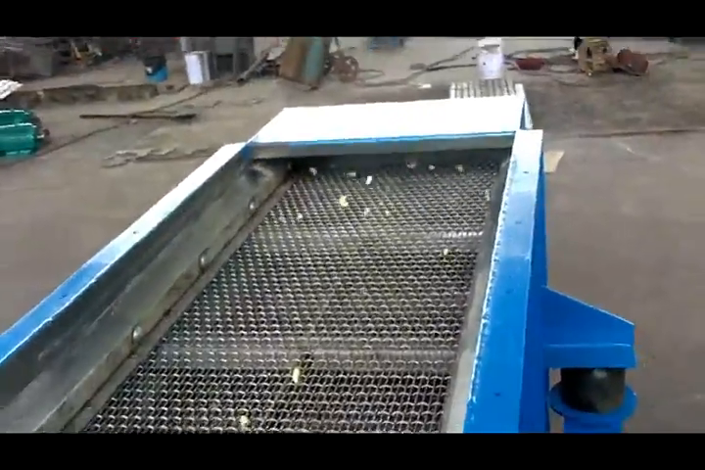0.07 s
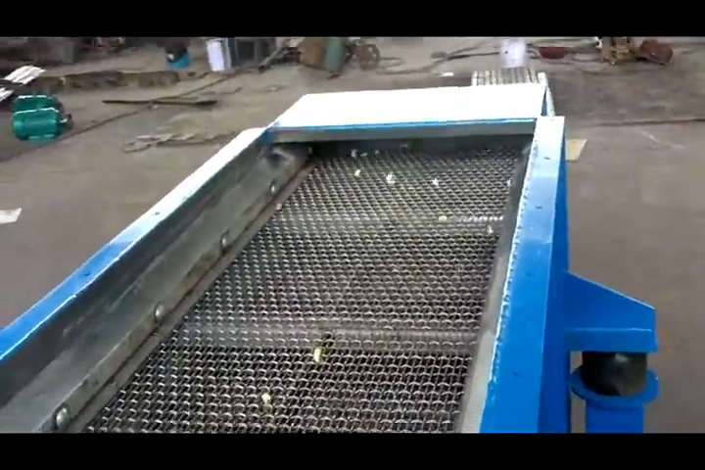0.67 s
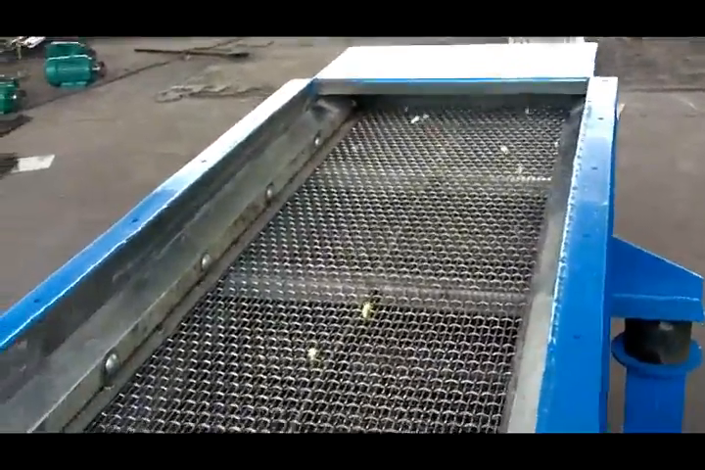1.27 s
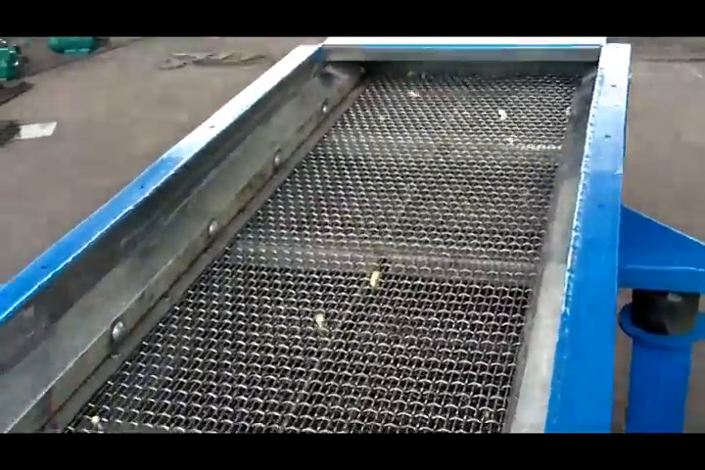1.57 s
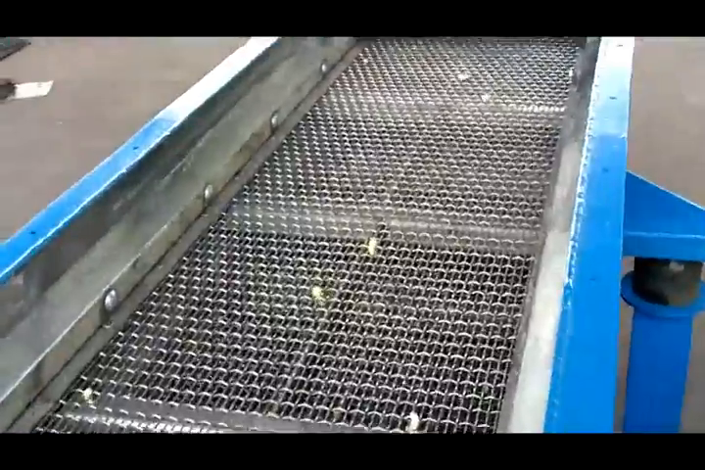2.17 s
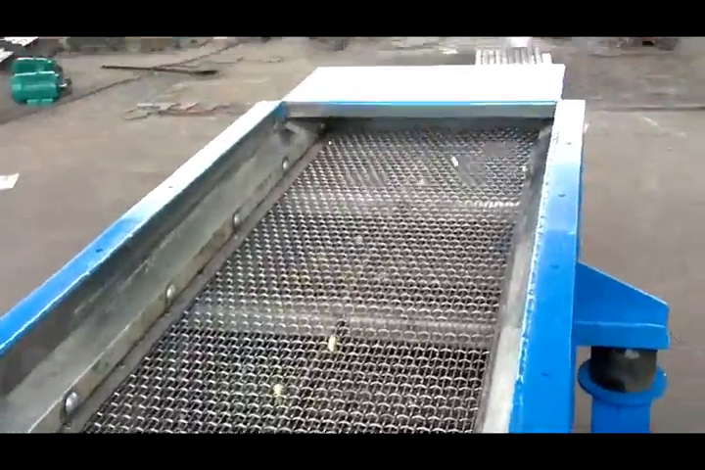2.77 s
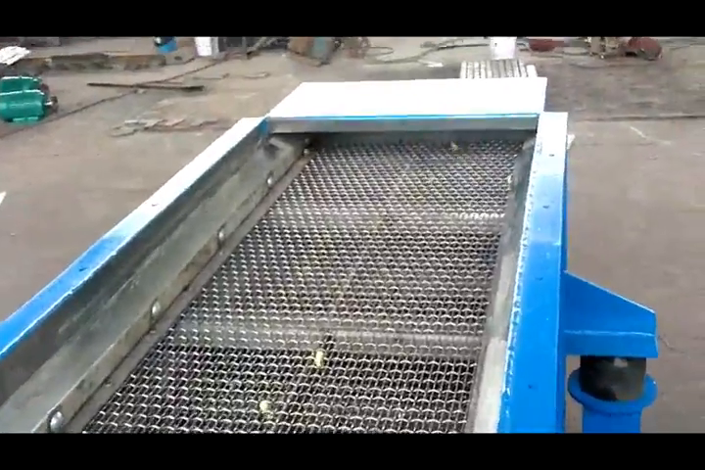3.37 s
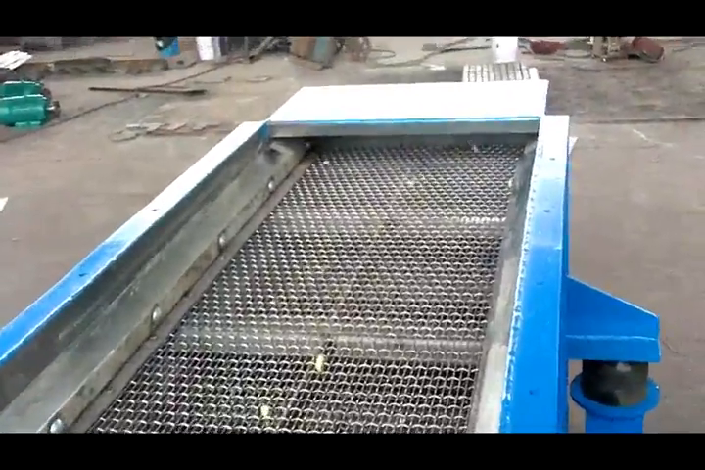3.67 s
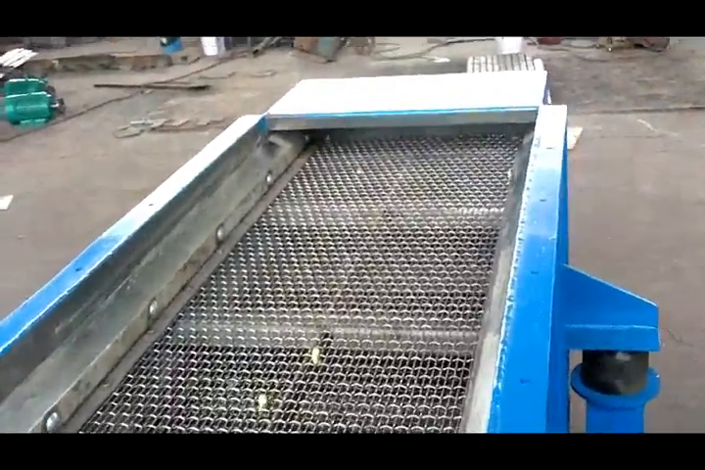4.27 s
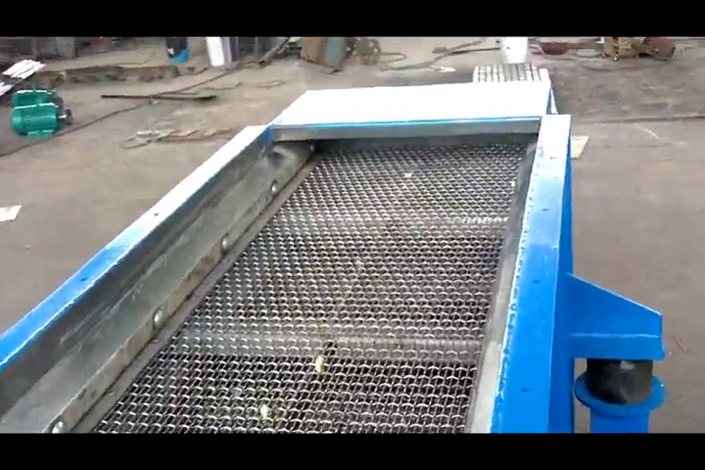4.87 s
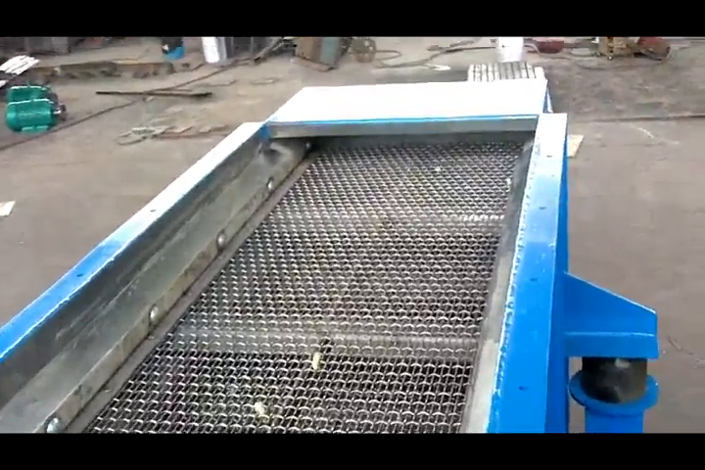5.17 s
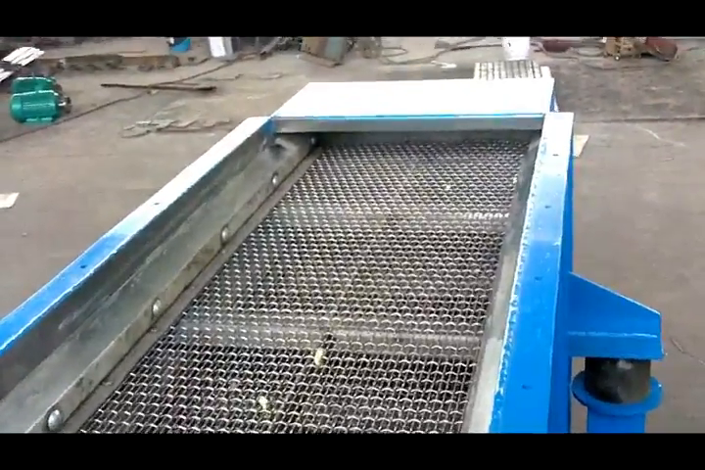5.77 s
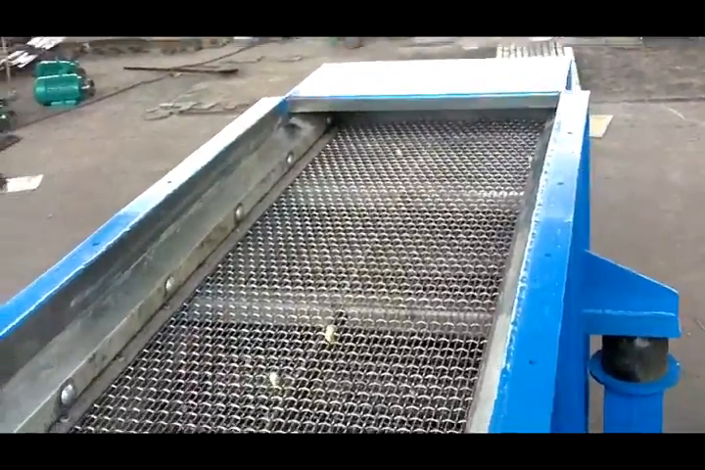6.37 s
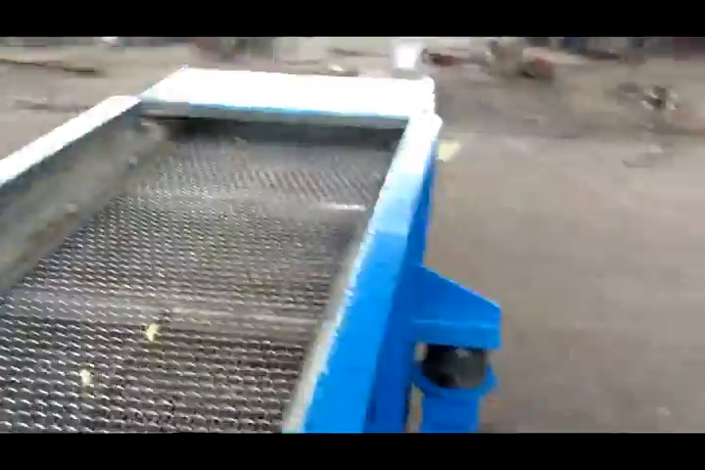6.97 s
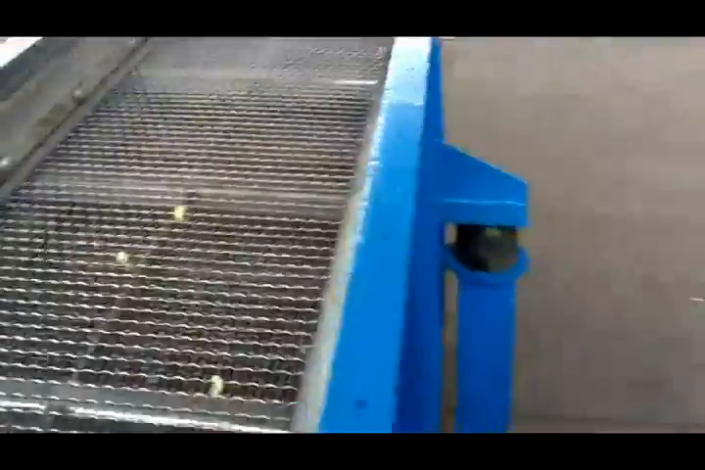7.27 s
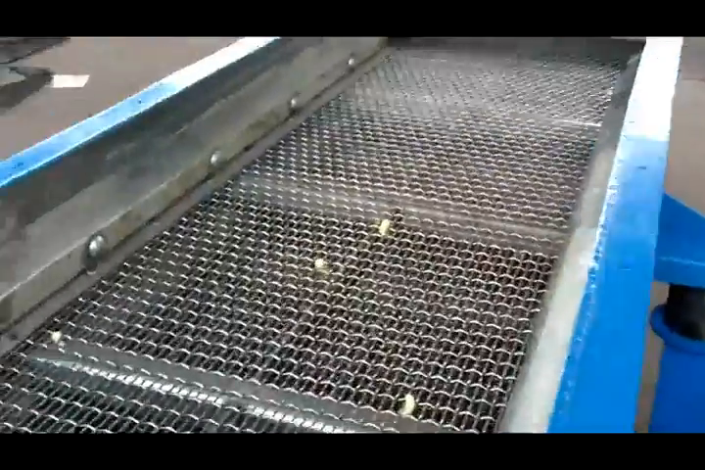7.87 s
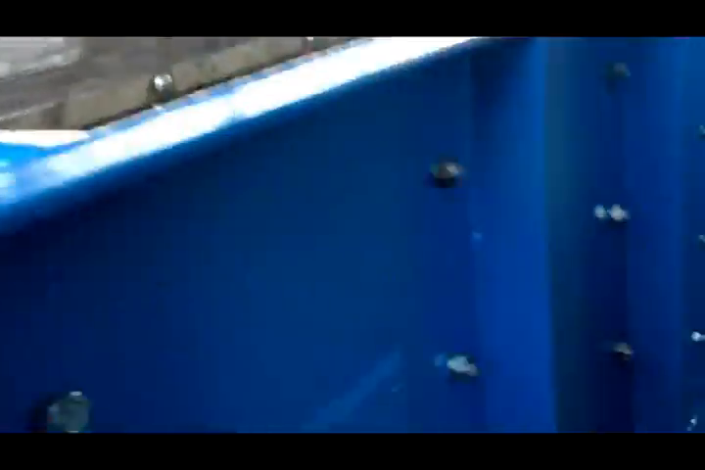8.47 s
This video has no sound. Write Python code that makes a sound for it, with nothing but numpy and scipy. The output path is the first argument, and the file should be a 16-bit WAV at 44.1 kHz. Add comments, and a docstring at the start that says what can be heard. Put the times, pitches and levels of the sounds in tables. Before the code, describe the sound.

Heard from just above its trough, a vibrating steel sieve hums, rumbles and rattles continuously, with a faint low workshop murmur behind it. Rapid metallic knocks blend into a hollow ringing clatter, topped by the fluttering hiss of wire mesh and a few small crumbs. An occasional dull thud breaks through, the clearest late on, then a hollow metal ring grows as the microphone moves nearer.

```python
"""A droning, rattling clatter under a pulsing hiss: a nearly empty vibrating screen, close up in a workshop.
Its eccentric weights turn about 1000 times a minute; each turn thumps the steel box as it lifts, knocks
it as it lands and rattles the deck against its clamps, while a low tone near 127 Hz drones in uneven
swells. The woven wire mesh and a few crumbs on it chatter as the hiss.
The microphone moves over the trough and leans in over its near wall at the end."""
import sys
import numpy as np
from scipy import signal
from scipy.fft import rfft, irfft, next_fast_len
from scipy.io import wavfile
from scipy.ndimage import uniform_filter1d

SR = 44100
rng = np.random.default_rng(int(sys.argv[2]) if len(sys.argv) > 2 else 0)


def transcribe(u):
    """Save the signal u as a 16-bit wav file named by the first command-line argument.

    u: samples, shape (n,) or (channels, n), limited to [-1, 1]; the rate is SR.
    q: integer samples, one column per channel.
    """
    v = np.clip(np.atleast_2d(u).T, -1, 1)
    q = np.round(v * 32767).astype(np.int16)
    wavfile.write(sys.argv[1], SR, q)


N = 374838

SHAFT_HZ = 16.599
HUM_BASE_HZ = SHAFT_HZ / 3
DRONE_MULTIPLE = 23   # of the hum's base
LANDING_TURN, LIFT_TURN = .67, .38   # shares of a turn
# the low drone's level, throbbing unevenly about three times a second: (time [s], level [dB])
DRONE_LEVEL = [(0.0, -40.5), (0.18, -21.5), (0.26, -41), (0.48, -24.5), (0.63, -29), (0.91, -27.5),
               (1.0, -24.5), (1.09, -35), (1.2, -23.5), (1.37, -30.5), (1.46, -21.5), (1.58, -38),
               (1.9, -23), (2.36, -32.5), (2.48, -27.5), (2.58, -33.5), (2.72, -21.5), (2.88, -35),
               (2.97, -22.5), (3.04, -36), (3.29, -29), (3.44, -33), (3.59, -22.0), (3.82, -28),
               (4.0, -17.5), (4.12, -26), (4.47, -29), (4.6, -22), (4.65, -17.5), (4.86, -25.5),
               (4.97, -18), (5.07, -23.5), (5.18, -20.5), (5.44, -24), (5.55, -28), (5.64, -17.5),
               (5.74, -24), (5.84, -17.5), (5.95, -29), (6.11, -18.5), (6.24, -28), (6.41, -21.5),
               (6.75, -23), (6.83, -19.5), (6.94, -40), (7.04, -23.5), (7.23, -27), (7.4, -20.5),
               (7.66, -23.5), (7.85, -28.5), (7.95, -22), (8.02, -39), (8.18, -23), (8.22, -21),
               (8.27, -42), (8.34, -25), (8.41, -30), (8.49, -22.5)]


def from_db(db):
    """Decibels to amplitude."""
    return 10 ** (np.asarray(db) / 20)


def rms_one(x):
    """Scales a signal to rms 1."""
    return x / np.sqrt(np.mean(x ** 2) + 1e-20)


def level_curve(rows):
    """A (time, level) table at every sample."""
    times, level_db = np.transpose(rows)
    return np.interp(np.arange(N) / SR, times, level_db)


def drift(rate_hz):
    """Smooth random wander with a spread of 1."""
    step, settle = 40, 2000
    pole = np.exp(-2 * np.pi * rate_hz * step / SR)
    noise = rng.standard_normal(N // step + settle + 2)
    slow = signal.lfilter([1], [1, -2 * pole, pole * pole], noise)[settle:]
    return np.interp(np.arange(N) / step, np.arange(len(slow)), rms_one(slow))


def coloured(x, spectrum):
    """Filters a sound by a (frequency, gain) table; rms 1."""
    size = next_fast_len(N)
    hz, gain_db = np.transpose(spectrum)
    bins_hz = np.maximum(np.arange(size // 2 + 1) * SR / size, 1)
    gain = from_db(np.interp(np.log(bins_hz), np.log(hz), gain_db))
    return rms_one(irfft(rfft(x, size) * gain, size)[:N])


def resonate(x, modes):
    """Parallel resonances, each applied twice for steep flanks; a mode's level sets its power."""
    out = 0
    for hz, width_hz, level_db in modes:
        b, a = signal.iirpeak(hz, hz / (2 * width_hz), fs=SR)
        ring = signal.lfilter(b, a, signal.lfilter(b, a, x + 1e-18))
        out = out + from_db(level_db) / np.sqrt(width_hz) * ring
    return out


def clicks_at(times, sizes):
    """A train of clicks at the given seconds."""
    at = np.round(times * SR).astype(int)
    inside = (at >= 0) & (at < N)
    return np.bincount(at[inside], sizes[inside], N)


def tone(hz, wander_turns=0):
    """A sine of rms 1 whose phase may wander."""
    turns = hz * np.arange(N) / SR + rng.random() + wander_turns
    return np.sqrt(2) * np.sin(2 * np.pi * turns)


def stroke(crest_turn):
    """A cosine that crests at the given share of every shaft turn."""
    return np.cos(2 * np.pi * (SHAFT_HZ * np.arange(N) / SR - crest_turn))


def shaken(modes, patchy_db, throb_db):
    """Irregular shaking rings the modes, shifted by throb_db at each landing; slow level evened to 1."""
    force = from_db(patchy_db * drift(32) + throb_db * stroke(LANDING_TURN))
    # neighbouring modes ring independently
    rings = sum(resonate(rng.standard_normal(N) * force, modes[first::2]) for first in range(2))
    return rings / np.sqrt(uniform_filter1d(rings ** 2, size=SR // 5) + 1e-20)


def knocking(tones, share, scatter_turns, waver_db, wander_turns):
    """One blow a turn: its harmonics crest nearly together, smeared by the steel and a little unsteady."""
    turns = SHAFT_HZ * np.arange(N) / SR - share
    out = 0
    for multiple, db in tones:
        lag = scatter_turns * rng.uniform(-0.96, 1) + wander_turns * drift(3)
        strength = from_db(db + waver_db * drift(4))
        out = out + strength * np.cos(2 * np.pi * (multiple * turns + lag))
    return np.sqrt(2) * out


def workshop():
    """Room tone: the workshop's low murmur behind the machine."""
    # colour of the murmur: (frequency [Hz], gain [dB])
    spectrum = [(15, 2.5), (45, 2.5), (70, -6), (100, 6), (250, -4.5), (500, -3.5), (1000, -42.5)]
    return from_db(-35.5) * coloured(rng.standard_normal(N), spectrum)


def frame(waver_db, wander_turns):
    """Harmonics of the knocking that fall on a mode of the steel frame sing out, a little unsteadily."""
    # singing harmonics: (multiple of the shaft rate, level [dB])
    tones = [(53, -53.5), (55, -49), (60, -51.5), (61, -45.5), (64, -50.5), (66, -45), (67, -45),
             (71, -44.5), (74, -43), (76, -44), (84, -49.5), (109, -44.5)]
    out = 0
    for multiple, db in tones:
        strength = from_db(db + waver_db * drift(4))
        out = out + strength * tone(multiple * SHAFT_HZ, wander_turns * drift(6))
    return from_db(-1.3) * out


def near_wall():
    """The trough's near wall rings, coming forward as the microphone leans in over it."""
    # the wall at the microphone: (time [s], level [dB])
    lean = [(0, -45.5), (7.6, -47), (8.0, -35), (8.2, -37), (8.35, -23.5), (8.5, -27.5)]
    # wall resonances: (frequency [Hz], width [Hz], level [dB])
    modes = [(498, 36, 0), (566, 50, -1), (611, 45, 4), (667, 16, -0.5), (710, 60, -3)]
    return from_db(level_curve(lean)) * shaken(modes, patchy_db=-1.5, throb_db=0.5)


def bumps():
    """Now and then the box lands harder, with a dull thud or a short knock."""
    # heavy landings: (time [s], peak [dB], pitch [Hz], width [Hz])
    landings = [(0.774, -16, 293, 30), (6.966, -16, 340, 160), (7.026, -8, 235, 150), (7.857, -16, 260, 25)]
    out = 0
    for time_s, peak_db, pitch_hz, width_hz in landings:
        thud = resonate(clicks_at(np.array([time_s]), np.ones(1)), [(pitch_hz, width_hz, 0)])
        out = out + from_db(peak_db) * thud / np.abs(thud).max()
    return out


def drone_swell_db():
    """How far the drone stands above or below its average of the surrounding second."""
    level_db = level_curve(DRONE_LEVEL)
    return level_db - uniform_filter1d(level_db, size=SR)


def side_plates():
    """The side plates rumble, throbbing at each landing and swelling with the drone."""
    # plate resonances: (frequency [Hz], width [Hz], level [dB])
    modes = [(67.5, 12, -18.5), (85, 9.9, -14.5), (108.7, 3.7, -5), (111.3, 6, 4), (117.5, 2, -7)]
    # the plates' rumble: (time [s], level [dB])
    levels = [(0, -31.5), (1.0, -29), (1.9, -24.5), (2.4, -31), (3.4, -26.5), (4.0, -29), (5.0, -29.5),
              (6.3, -28), (7.3, -26.5), (8.5, -25.5)]
    strength = from_db(level_curve(levels) - 3.0 + 0.4 * drone_swell_db())
    return strength * shaken(modes, patchy_db=1.0, throb_db=3.5)


def underside(beat_hz, crest_s, beat_db):
    """The underside thumps as the box lifts, and booms with a slow beat."""
    # harmonics of the thump: (multiple of the shaft rate, level [dB])
    tones = [(9, -45.5), (10, -37.5), (11, -41.5), (12, -34.5), (13, -38.5)]
    # underside resonances: (frequency [Hz], width [Hz], level [dB])
    modes = [(165, 5.4, -6), (177.4, 6.7, 1.5), (190, 3.5, -14), (199.5, 6.6, 1.5), (209, 14, -1)]
    # the boom: (time [s], level [dB])
    levels = [(0, -28), (.5, -29), (1.05, -30), (1.4, -30.5), (1.8, -24), (2.5, -27.5), (2.73, -34),
              (3.05, -23.5), (3.4, -32.5), (4.1, -31.5), (4.35, -39), (4.55, -27.5), (4.75, -34),
              (5.0, -27), (6.0, -33), (6.35, -23), (6.6, -33), (6.85, -35), (7.03, -32), (7.3, -38),
              (7.62, -28), (7.95, -29), (8.25, -24), (8.5, -31)]
    thumps = knocking(tones, LIFT_TURN, scatter_turns=0.1, waver_db=1.0, wander_turns=0.082)
    beat = np.cos(2 * np.pi * beat_hz * (np.arange(N) / SR - crest_s))
    boom = shaken(modes, patchy_db=1.0, throb_db=0.1)
    return thumps + from_db(level_curve(levels) - 0.2 + beat_db * beat) * boom


def cross_beams():
    """The cross beams knock as the box lands, and rumble with its shaking."""
    # harmonics of the knock: (multiple of the shaft rate, level [dB])
    tones = [(15, -40), (16, -39), (17, -36.5), (18, -39), (19, -42.5), (20, -47.5), (21, -35), (22, -36),
             (23, -44), (24, -43), (26, -43.5), (27, -44), (30, -48)]
    # beam resonances: (frequency [Hz], width [Hz], level [dB])
    modes = [(255, 10, -3), (284.8, 12, -1), (304, 9.9, 0.5), (319, 19, -7.5), (353.7, 30, -7.5),
             (393, 23, -1.5), (412.1, 6.4, -4.5), (436.8, 14, -5.5)]
    # the beams' rumble: (time [s], level [dB])
    levels = [(0, -25), (3.0, -26), (4.2, -22), (4.8, -24.5), (7.8, -24), (8.5, -28)]
    knocks = knocking(tones, LANDING_TURN, scatter_turns=0.21, waver_db=0.5, wander_turns=0.06)
    rumble = shaken(modes, patchy_db=0.8, throb_db=-0.2)
    return knocks + from_db(level_curve(levels) - 4.0) * rumble


def trough():
    """The steel trough under the microphone rings hollow and clangs at each landing."""
    # hollow resonances: (frequency [Hz], width [Hz], level [dB])
    modes = [(489.5, 26, -9), (547.6, 36, -4.5), (611.6, 20, -4), (663, 34, -2), (716.5, 34, 0),
             (755, 39.4, 1), (786, 38, -2.5), (822, 27, -6)]
    # harmonics of the clang: (multiple of the shaft rate, level against the ring [dB])
    tones = [(40, -13.5), (41, -19), (44, -14), (46, -14.5), (47, -13.5), (48, -12.5)]
    # the trough as the microphone moves over it: (time [s], level [dB])
    levels = [(0, -29.5), (.45, -34), (.8, -29), (1.4, -27.5), (2.0, -28.5), (2.45, -27.5), (3.2, -30.5),
              (3.55, -26.5), (4.0, -29.5), (4.22, -26.5), (4.5, -27.5), (4.85, -26), (5.2, -29),
              (5.9, -26.5), (6.3, -29.5), (6.9, -29.5), (7.2, -27), (7.65, -28.5), (7.9, -26.5),
              (8.25, -26), (8.5, -35)]
    ring = shaken(modes, patchy_db=1.3, throb_db=0.0)
    clang = knocking(tones, LANDING_TURN, scatter_turns=0.25, waver_db=3.5, wander_turns=0.13)
    return from_db(level_curve(levels) - 0.3) * (ring + clang)


def hum(gain_db, waver_db):
    """The shaking box hums on low tones; the heavy sway is nearly steady, higher tones waver."""
    # tones of the box: (multiple of the hum's base, level [dB])
    tones = [(3, -27), (9, -54), (15, -37.5), (16, -46), (19, -39), (21, -42.5), (24, -41), (32, -34.5),
             (38, -42)]
    out = 0
    for multiple, db in tones:
        looseness = min(multiple / DRONE_MULTIPLE, 1)
        strength = from_db(db + gain_db + waver_db * looseness * drift(2.7))
        out = out + strength * tone(multiple * HUM_BASE_HZ)
    return out


def mesh(ticks_per_s, spread_db, swing_db, flutter_db, flex_s):
    """Crossing wires and crumbs tick, hardest on the upstroke; flexing bends the wires' pitch."""
    # colour of the chatter: (frequency [Hz], gain [dB])
    spectrum = [(700, -8), (1500, -2), (2000, -2.5), (2500, -3), (2900, -0.5), (3700, -5), (4600, -7.5),
                (5300, -11), (6000, -20), (6500, -24.5), (7000, -41)]
    # wire resonances: (frequency [Hz], width [Hz], level [dB])
    modes = [(1946, 30, -2), (2887, 110, 0), (3056, 34, 2.5), (3210, 260, -3.5), (3680, 50, -8.5),
             (4060, 50, -7)]
    # the wires' ring against the hiss: (time [s], level [dB])
    ring_levels = [(0, -13), (.25, -12), (.6, -12), (1.0, -15), (1.14, -6), (1.3, -11.5), (2.0, -20),
                   (4.2, -12), (6.2, -11), (7.8, -19), (8.5, -24)]
    # the mesh, a little louder when the microphone is close: (time [s], level [dB])
    nearness = [(0, -28), (1.2, -28), (2.3, -27.5), (3.2, -28.9), (5.3, -29), (6.8, -29), (7.4, -28),
                (7.9, -27.5), (8.5, -29.0)]
    t = np.arange(N) / SR
    chance = np.minimum(rng.exponential(1, N), 3)
    sizes = from_db(spread_db * chance + swing_db * stroke(crest_turn=.36) + flutter_db * drift(29))
    ticks = (rng.random(N) < ticks_per_s / SR) * sizes * rng.choice([-1, 1], N)
    wires = sum(np.interp(t + flex_s * drift(3.08), t, resonate(ticks, [mode])) for mode in modes)
    jangle = from_db(level_curve(ring_levels) - 0.5) * rms_one(wires)
    return from_db(level_curve(nearness) + 1.0) * (coloured(ticks, spectrum) + jangle)


def steel_ring(crack_t60, ring_t60, ring_db):
    """One contact's answer: a short crack, then the dense ring of frame and hall."""
    t = np.arange(SR // 2) / SR
    fade = from_db(-60 * t / crack_t60) + from_db(ring_db - 60 * t / ring_t60)
    return rms_one(rng.standard_normal(len(t)) * fade)


def deck(uneven_db, slip_s, loose_s, rebound_db):
    """Each deck contact knocks once a turn, nearly on time, and rebounds more loosely on another spot."""
    # contacts with the clamps: (moment [share of a turn], strength [dB])
    contacts = [(.07, -2.5), (.14, -5.5), (.26, -3), (.46, -4.5), (.53, -2), (.61, -6.5), (.67, -3.5),
                (.81, -3), (.92, -7.5)]
    # colour of the clatter: (frequency [Hz], gain [dB])
    spectrum = [(200, -27.5), (350, -10), (480, -4), (560, -5.5), (670, -3.5), (770, -3), (900, -2),
                (1050, -2.5), (1200, -2.5), (1420, -6), (1620, -13.5), (1950, -8), (2500, -14), (4000, -54)]
    # the clatter: (time [s], level [dB])
    levels = [(0, -26), (1.0, -27), (2.0, -26), (3.1, -26.5), (3.5, -25), (3.9, -26.8), (5.0, -27),
              (6.3, -26.5), (6.8, -29), (7.2, -27.2), (8.5, -28)]
    turns = np.arange(int(N / SR * SHAFT_HZ) + 2)
    out = 0
    for share, db in contacts:
        slip, delay, knock_size, rebound_size = rng.standard_normal((len(turns), 4)).T
        due_s = (turns + share) / SHAFT_HZ
        knocks = clicks_at(due_s + slip_s * slip, from_db(db + uneven_db * knock_size))
        rebound_s = due_s + loose_s * np.abs(delay)
        rebounds = clicks_at(rebound_s, from_db(db + rebound_db + uneven_db * rebound_size))
        for blows in (knocks, rebounds):
            ring = steel_ring(crack_t60=0.03, ring_t60=0.51, ring_db=-7)
            running = np.pad(blows, (len(ring) - 1, 0), "wrap")   # the frame is already ringing
            out = out + signal.oaconvolve(running, ring, "valid")
    return from_db(level_curve(levels)) * coloured(out, spectrum)


def drone(gain_db, swell, wander_turns):
    """A low tone near 127 Hz drones in uneven swells, its phase wandering; swell deepens the throb."""
    strength = from_db(level_curve(DRONE_LEVEL) + gain_db + swell * drone_swell_db())
    return strength * tone(DRONE_MULTIPLE * HUM_BASE_HZ, wander_turns * drift(0.85))


def scene():
    """One close microphone: the box's hum and rumble, deck clatter and mesh hiss over the room tone."""
    tones = hum(gain_db=0.5, waver_db=2.0) + drone(gain_db=0.5, swell=0.14, wander_turns=0.097)
    rumble = underside(beat_hz=3.195, crest_s=.18, beat_db=1.2) + cross_beams() + side_plates()
    steel = frame(waver_db=1.5, wander_turns=0.11) + trough() + near_wall()
    clatter = deck(uneven_db=1.0, slip_s=.00014, loose_s=.014, rebound_db=0.5)
    hiss = mesh(ticks_per_s=11000, spread_db=0.45, swing_db=0.85, flutter_db=0.53, flex_s=.00012)
    return (workshop() + tones + rumble + steel + bumps() + clatter + hiss)[None]


def record(dry):
    """A steep low-pass cuts the top."""
    cutoff_hz = 7250
    return signal.sosfilt(signal.ellip(12, .1, 90, CUTOFF_HZ := cutoff_hz, fs=SR, output="sos"), dry)


dry = scene()
out = record(dry)
transcribe(out)
```